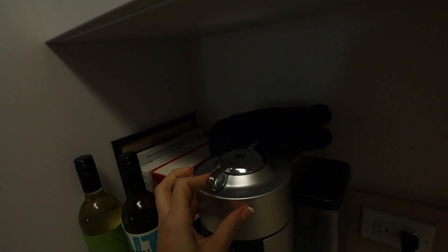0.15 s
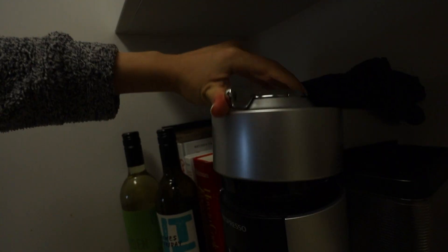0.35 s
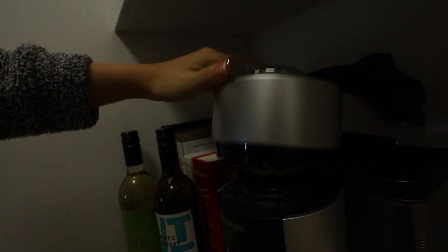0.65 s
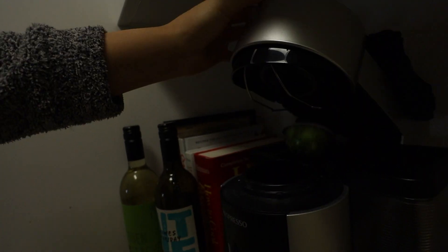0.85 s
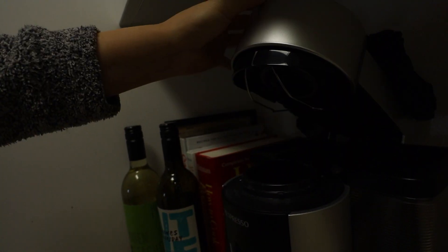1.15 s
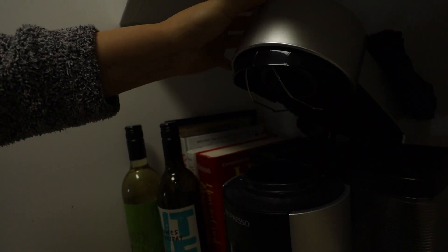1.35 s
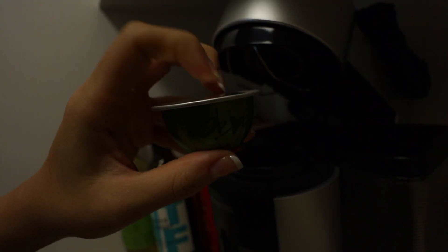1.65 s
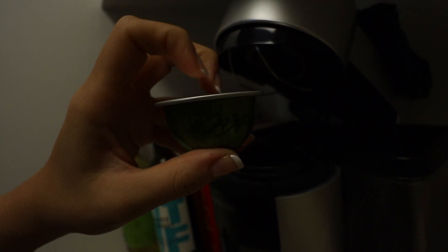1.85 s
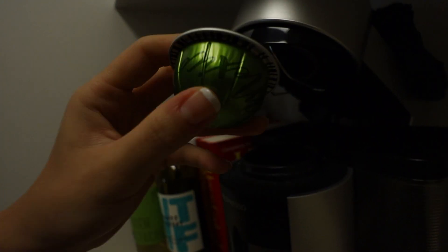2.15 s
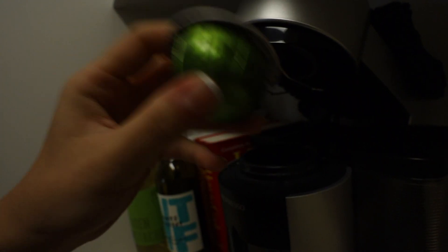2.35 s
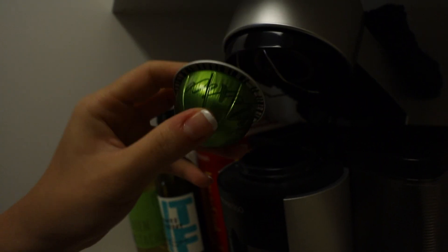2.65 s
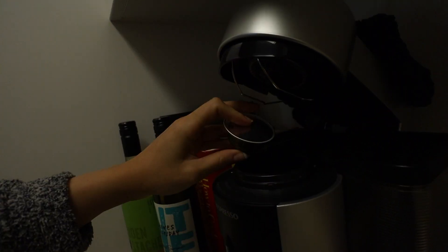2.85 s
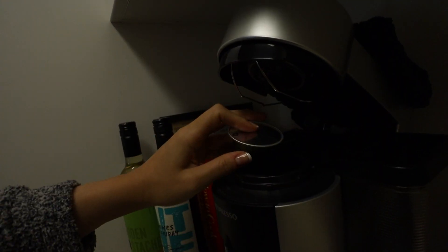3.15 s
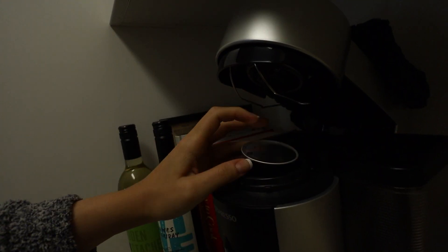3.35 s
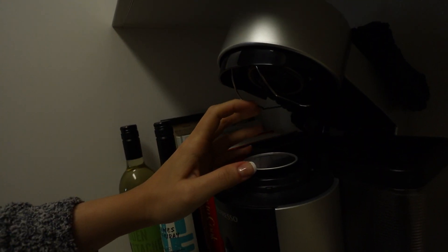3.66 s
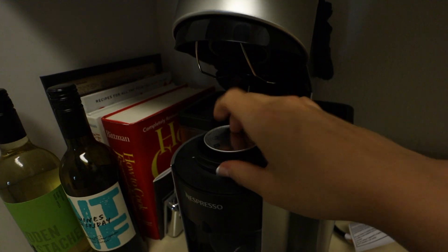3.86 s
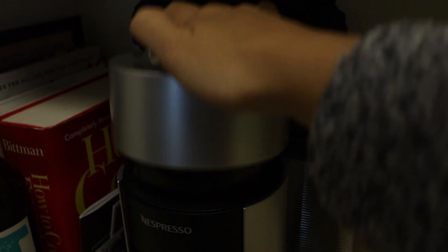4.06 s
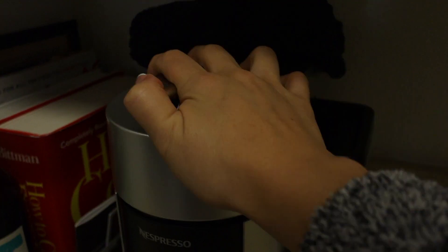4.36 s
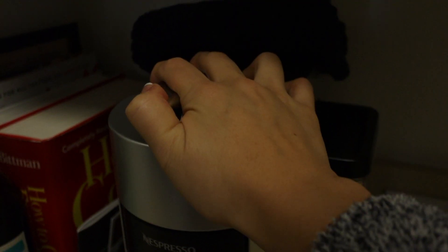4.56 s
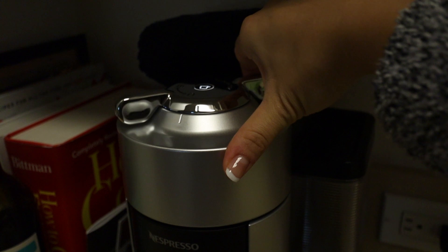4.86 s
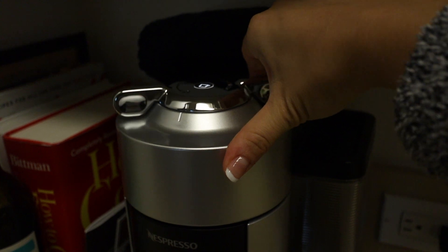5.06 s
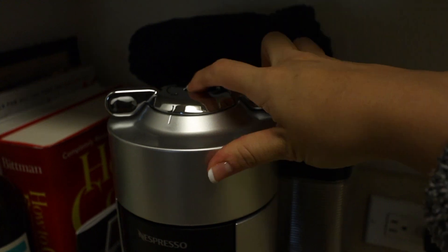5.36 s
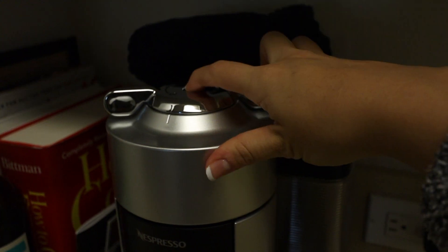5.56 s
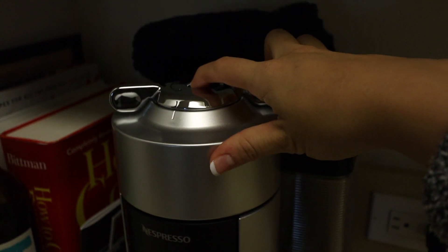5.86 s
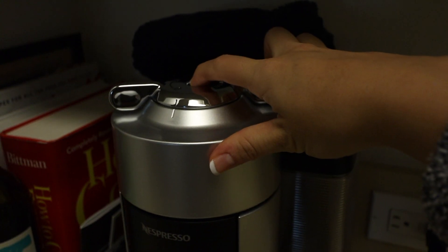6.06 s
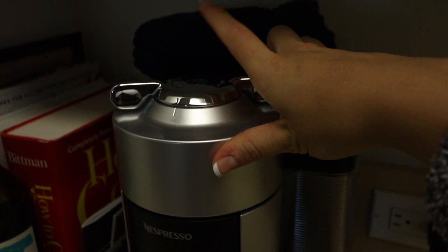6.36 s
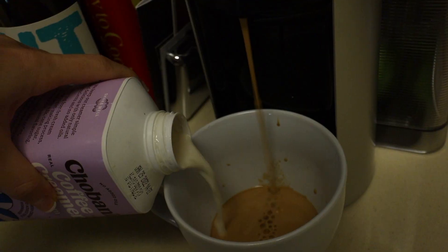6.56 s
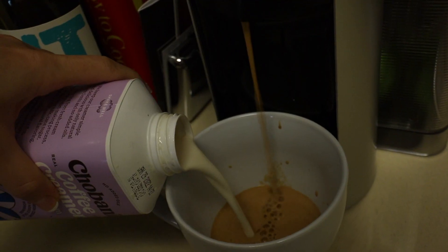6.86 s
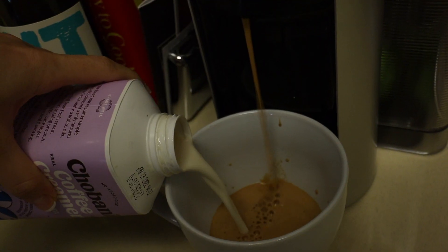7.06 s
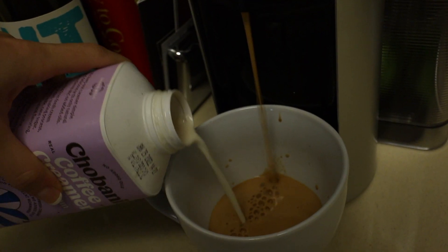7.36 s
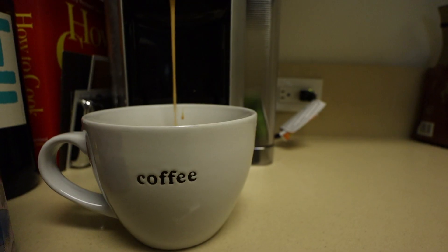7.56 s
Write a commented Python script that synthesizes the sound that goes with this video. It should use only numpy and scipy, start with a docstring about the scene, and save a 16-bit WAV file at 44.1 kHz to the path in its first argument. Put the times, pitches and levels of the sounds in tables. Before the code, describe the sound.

Dry, close-miked sounds of a capsule coffee machine, edited with abrupt cuts: lever knocks, a burst of lid rattles, light nail ticks, whispery foil strokes and thin capsule clacks. The lid slams, the latch cracks and the lever locks. After a dull button click, a buzzing motor accelerates, then switches suddenly to a softer hum with faint whine while drops plop into a mug. Short kitchen reflections, low room noise.

```python
"""A lever unlocks with hard plastic clacks, then the lid of a capsule coffee machine springs open and rattles.
Fingernails tap and stroke a foil capsule, it drops into its seat, the lid is pressed shut and locked.
A button clicks, the motor spins up, then hums while coffee and creamer splash into a mug.
Contacts are noise bursts plus ringing modes; the motor is a comb of shaft orders, tones and noise;
drops are slaps and rising sine bubbles; friction is grainy noise. A quiet room lies under it all."""
import sys
import numpy as np
from scipy import signal
from scipy.fft import rfft, irfft, next_fast_len
from scipy.io import wavfile
from scipy.ndimage import map_coordinates

SR = 44100
rng = np.random.default_rng(int(sys.argv[2]) if len(sys.argv) > 2 else 0)


def to_wav(sig):
    """Store sig (one row per channel, or 1-D mono) as 16-bit WAV at the path in sys.argv[1].

    Samples outside -1..1 are clipped; the rate is SR.
    """
    pcm = np.clip(np.atleast_2d(sig), -1, 1) * 32767
    pcm = np.round(pcm).astype(np.int16)
    wavfile.write(sys.argv[1], SR, pcm.T)  # frames by channels


N = 339570


def amp(db):
    """Decibels to gain."""
    return 10 ** (np.asarray(db) / 20)


def unit(x):
    """x at rms 1."""
    return x / np.sqrt(np.mean(x ** 2) + 1e-20)


def clock(count):
    """Sample times in seconds."""
    return np.arange(count) / SR


def along(points, hz):
    """(Hz, value) points interpolated on a log frequency axis."""
    f, v = np.transpose(points)
    return np.interp(np.log(hz + 1), np.log(f + 1), v)


def curves(rows):
    """One value per sample for each column after the time."""
    s, *cols = np.transpose(rows)
    return [np.interp(clock(N), s, c) for c in cols]


def add(track, s, x):
    """Mix x into the track from time s."""
    part = track[max(round(s * SR), 0):][:len(x)]
    part += x[:len(part)]


def coloured(x, gain):
    """x through a causal minimum-phase filter with the given gain of frequency."""
    m = 2 * next_fast_len(len(x) // 2 + 4096)
    cepstrum = irfft(np.log(np.maximum(gain(np.fft.rfftfreq(m, 1 / SR)), 1e-6)))
    # fold onto positive time
    cepstrum[1:m // 2] *= 2
    cepstrum[m // 2 + 1:] = 0
    response = np.exp(rfft(cepstrum))
    return irfft(rfft(x, m) * response)[:len(x)]


def noise(spectrum):
    """Noise of rms 1 with the given spectrum."""
    return unit(coloured(rng.standard_normal(N), lambda hz: amp(along(spectrum, hz))))


def peaks(rows, hz):
    """Gain of a few resonances."""
    return sum(amp(db) / (1 + (2 * (hz - centre) / width) ** 2) for centre, width, db in rows)


def wobble(rate_hz):
    """A smooth random curve, rate_hz knots a second."""
    coarse = np.arange(0, N + 16, 16)
    knots = rng.standard_normal(int(N * rate_hz / SR) + 4)
    smooth = map_coordinates(knots, [coarse * rate_hz / SR])
    return np.interp(np.arange(N), coarse, smooth)


def burst(spectrum, t60_s):
    """A short dying burst of noise, coloured by the body that it shakes."""
    t = clock(SR // 2)
    dying = rng.standard_normal(len(t)) * amp(-60 * t / t60_s)
    return coloured(dying, lambda hz: amp(along(spectrum, hz)))


# Reverberation of the room. Each row: frequency in Hz, t60 in seconds.
KITCHEN = [(100, 0.82), (550, 0.49), (2000, 0.47), (7000, .45), (14000, 0.14)]


def kitchen(x):
    """The room's answer to one short sound; the treble dies first."""
    hz, t, z = signal.stft(rng.standard_normal(SR // 2), SR, nperseg=256)
    decay = amp(-60 * t / along(KITCHEN, hz)[:, None])
    tail = signal.istft(z * decay, SR, nperseg=256)[1]
    tail = tail * (1 - np.exp(-clock(len(tail)) / 0.0027))
    return signal.fftconvolve(x, tail / np.linalg.norm(tail))[:len(x)]


# Times at which contact, friction and hoot sounds stop dead, in seconds.
STOPS_S = [1.523, 3.725, 4.394, 4.795, 5.359]


def stopped(x, s):
    """A sound starting at s, silenced at the next stop."""
    end = min([stop for stop in STOPS_S if stop > s], default=N / SR)
    return x * (s + clock(len(x)) < end)


# Dense clatter between a part's modes. Each row: frequency in Hz, relative level in dB per Hz.
CLATTER = [(30, -11.5), (90, 1.5), (300, -1.5), (470, -4.5), (850, -3.5), (1600, -6), (3000, -7.5),
           (6000, -10), (10000, -13.5), (11500, -18), (15000, -24.5)]
# Edges between thump, body, clack and crack, in Hz.
BANDS_HZ = [450, 1200, 3500]


def contacts(hits, modes, ring_db, ring_t60_s, snap_db, snap_t60_s, lowest_hz, room_db, detune=0.0074):
    """Each contact snaps, clatters and rings the modes; four band levels set its thump, body, clack and crack."""
    track, t = np.zeros(N), clock(SR // 2)
    edges = np.array([lowest_hz, *BANDS_HZ, SR / 2])[:, None]
    grid = np.fft.rfftfreq(len(t), 1 / SR) + 1
    bands = 1 / (1 + ((grid - edges[:-1] * edges[1:] / grid) / np.diff(edges, axis=0)) ** 6)
    lowpass = signal.butter(2, BANDS_HZ[-1], fs=SR, output="sos")
    for s, db, thump_db, clack_db, crack_db, t60_s in hits:
        # grip and point of contact shift the modes a little each time
        ring = 0
        for hz, level_db in modes:
            cycles = hz * (1 + detune * rng.normal()) * t + rng.random()
            ring = ring + amp(level_db + rng.normal(0, 2.5)) * np.sin(2 * np.pi * cycles)
        ring = ring * amp(-60 * t / ring_t60_s)
        clatter = unit(burst(CLATTER, t60_s))
        snap = unit(burst(CLATTER, snap_t60_s))
        blow = clatter + amp(snap_db) * snap + amp(ring_db) * unit(ring)
        blow = blow * (1 - np.exp(-t / 0.00072))
        low = signal.sosfiltfilt(lowpass, blow)
        blow = low + (blow - low) * amp(-60 * t / 0.23)  # plastic damps the treble soonest
        # levels are the energy of a blow, as an rms over a hundredth of a second
        wanted = amp(db + np.array([thump_db, 0, clack_db, crack_db])) ** 2 * SR / 100
        gain = np.sqrt(wanted / np.mean(bands * np.abs(rfft(blow)) ** 2, axis=1) @ bands)
        blow = coloured(blow, lambda hz: np.interp(hz, grid, gain))
        add(track, s, stopped(blow + amp(room_db) * kitchen(blow), s))
    return track


def plastic(hits, crack_db):
    """On plastic one hardness sets both the clack and the crack above it."""
    return [(s, db, thump_db, hard_db, hard_db + crack_db, t60_s) for s, db, thump_db, hard_db, t60_s in hits]


# All plastic hits below. Each row: start in seconds, body level in dB, thump in dB over the body,
# hardness in dB over the body, clatter t60 in seconds.
# All modes below. Each row: nominal frequency in Hz, nominal relative level in dB.
LEVER_HITS = [(0.045, -25, 5, 1.5, 0.1), (0.309, -20.5, -0.5, -4.5, 0.15), (0.324, -28, 1, 7, 0.038),
              (0.353, -20, -11.5, -2, 0.16), (0.462, -46, 0, 11.5, 0.035), (0.701, -20, -8, 1.5, 0.091)]
LEVER_MODES = [(100, -16), (221, 5), (382, 0), (620, 1.5), (705, -6), (830, 1), (940, 3), (1500, -4),
               (2450, -6.5), (3526, -5), (7149, -15.5)]


def lever_unlocking():
    """The plastic lever knocks loose and rings its modes."""
    return contacts(plastic(LEVER_HITS, crack_db=-3.5), LEVER_MODES, ring_db=-1.5, ring_t60_s=0.07, detune=0.025,
                    snap_db=-5, snap_t60_s=0.0082, lowest_hz=50, room_db=-22)


LID_HITS = [(0.925, -36.5, 10, 1, 0.053), (0.991, -40.5, 5.5, -3, 0.049), (1.045, -29, 10, 0.5, 0.099),
            (1.097, -15.5, 0, 5.5, 0.13), (1.139, -16.5, 5, 0.5, 0.18), (1.167, -11.5, 4, 4, 0.1),
            (1.234, -23.5, -6, 1, 0.06), (1.245, -25, 5, -0.5, 0.055), (1.28, -22.5, -6.5, -6.5, 0.054),
            (1.318, -28, 5.5, -3.5, 0.047), (1.403, -15, 5.5, 1, 0.11), (1.431, -19.5, 3.5, -0.5, 0.14),
            (1.458, -14.5, 1, 1, 0.28), (1.482, -4, -6.5, -3, 0.098)]
LID_MODES = [(190, -8.5), (275, -2.5), (325, 5), (382, 0.5), (770, -4), (880, -5.5), (1130, -9), (1604, -5),
             (1950, -5.5), (2290, -4.5), (9600, -11)]


def lid_opening():
    """The sprung lid strikes and rattles, ringing its modes."""
    return contacts(plastic(LID_HITS, crack_db=-3.5), LID_MODES, ring_db=0.5, ring_t60_s=0.088, detune=0.03,
                    snap_db=-7.5, snap_t60_s=0.014, lowest_hz=87.5, room_db=-22)


# Each row: start in seconds, body level in dB, thump, clack and crack in dB over the body, clatter t60 in seconds.
RIM_HITS = [(2.797, -23.5, -11, 2, 7, 0.096)]
RIM_MODES = [(110, -3), (754, 3.5), (1367, -3), (2982, -0.5), (5744, -7)]


def rim_knocking():
    """The capsule's rim knocks against the holder."""
    return contacts(RIM_HITS, RIM_MODES, ring_db=-1, ring_t60_s=0.035,
                    snap_db=-7.5, snap_t60_s=0.029, lowest_hz=70, room_db=-21)


# Columns as for the rim.
CAPSULE_HITS = [(2.969, -28.5, -12.5, -17.5, -29.5, 0.046), (3.361, -23.5, -23.5, 5, -2, 0.028),
                (3.383, -27.5, -10, 1, -4.5, 0.094), (3.402, -22.5, -19, -10, -8, 0.028),
                (3.479, -29, -25, 6, -11, 0.016), (3.544, -37.5, -26, -12, -12, 0.097),
                (3.582, -24, -25, -5.5, -18.5, 0.093), (3.845, -22.5, -7.5, -36, -14, 0.012),
                (4.045, -33.5, -16, -22, -34, 0.029), (4.067, -30.5, -3, -15, -11, 0.07)]
CAPSULE_MODES = [(120, -10), (570, 2.5), (650, 8), (780, 5), (920, 0.5), (1480, -0.5), (1780, -1),
                 (2950, -17), (5900, -13.5)]


def capsule_landing():
    """The foil capsule lands on its rim or its cup, so its crack differs each time."""
    return contacts(CAPSULE_HITS, CAPSULE_MODES, ring_db=8, ring_t60_s=0.031, detune=0.032,
                    snap_db=0, snap_t60_s=0.006, lowest_hz=79.5, room_db=-20)


SHUT_HITS = [(4.128, -15, -15, 12, 0.026), (4.141, -22, -7.5, 3.5, .12), (4.171, -32.5, 2.5, -2.5, 0.04)]
SHUT_MODES = [(215, -5.5), (900, -5), (1340, -10), (1560, -3), (4200, -16.5)]


def lid_shutting():
    """The lid slams shut; its ring is short."""
    return contacts(plastic(SHUT_HITS, crack_db=-6.5), SHUT_MODES, ring_db=-3.5, ring_t60_s=0.012,
                    snap_db=-5, snap_t60_s=0.0056, lowest_hz=31, room_db=-11.5)


LATCH_HITS = [(4.485, -32.5, 0.5, -7, 0.11), (4.503, -7, -13.5, 1, 0.089)]
LATCH_MODES = [(200, -8), (420, -11.5), (870, 4), (985, -1), (1680, -0.5), (2360, -7), (3100, -10.5)]


def latch():
    """The latch catches and rings its modes."""
    return contacts(plastic(LATCH_HITS, crack_db=-4.5), LATCH_MODES, ring_db=-4.5, ring_t60_s=0.042,
                    snap_db=-4, snap_t60_s=0.04, lowest_hz=55, room_db=-18)


LOCK_HITS = [(4.902, -25, -3.5, -5, 0.11), (5.133, -47.5, -10, 4, 0.056), (5.148, -38, 0, 1, 0.09),
             (5.157, -6.5, -3, -6.5, 0.096)]


def lever_locking():
    """The lever swings home and locks, ringing the latch's modes."""
    return contacts(plastic(LOCK_HITS, crack_db=-3), LATCH_MODES, ring_db=-2, ring_t60_s=0.042,
                    snap_db=-5, snap_t60_s=0.018, lowest_hz=135, room_db=-20.5)


def buzz(turn, gain, count):
    """The same rough spots pass once a turn: every shaft order up to count, coloured by gain, at rms 1."""
    one_turn = irfft(np.r_[0, np.exp(2j * np.pi * rng.random(count))], 8192)
    place = np.arange(len(one_turn)) / len(one_turn)
    passing = np.interp(turn / (2 * np.pi) % 1, place, one_turn)
    return unit(coloured(passing, gain))


MOTOR_ON_S, BREW_ON_S = 5.757, 6.465
# Nominal shaft speed. Each row: time in seconds, turns per second.
SPIN = [(5.757, 15.05), (6.0, 23.7), (6.183, 28.95), (6.465, 37.8)]
# Gear tones. Each row: shaft order, nominal relative level in dB.
SPIN_ORDERS = [(4, -19), (6, -14.5), (7, -15.5), (13, -12.5), (48, -22.5), (72, -24), (96, -28), (120, -28),
               (144, -29)]
# Rush and whir. Each row: frequency in Hz, relative level in dB per Hz.
SPIN_COLOUR = [(24, -45), (101, -7.5), (224, -2), (449, 0), (577, -5), (778, -3.5), (1130, -11.5),
               (1730, -18), (5400, -24), (6320, -33), (7910, -27), (15500, -39.5)]
# Housing resonances. Each row: frequency in Hz, width in Hz, relative level in dB.
HOUSING = [(445, 60, 6), (789, 78, 1), (1242, 100, -3), (2230, 160, -9.5), (3000, 130, -15),
           (3740, 240, -11.5), (4290, 170, -14.5), (5530, 250, -19)]
SPIN_DB, SPIN_DB_PER_DOUBLING = -32, 6
SPIN_REFERENCE_HZ = 26.5


def spin_up(rush_db=-13, buzz_db=-3.5, waver_rad=1.1, swell_db_per_hz=0.38, pulsing=0.24, rattle_db=-8):
    """The motor whirls the capsule faster: rough spots shake the housing each turn, a comb climbs, gears sing."""
    t = clock(N)
    speed_hz, = curves(SPIN)
    turn = 2 * np.pi * np.cumsum(speed_hz * (1 + 0.003 * wobble(60))) / SR
    tones = 0
    for order, level_db in SPIN_ORDERS:
        level = amp(level_db + 2.1 * wobble(25))
        waver = waver_rad * np.sqrt(order / SPIN_ORDERS[-1][0]) * wobble(200)
        tones = tones + level * np.sqrt(2) * np.sin(order * turn + waver)
    rattle = buzz(turn, lambda hz: peaks(HOUSING, hz), count=400)
    whir = buzz(turn, lambda hz: amp(along(SPIN_COLOUR, hz)), count=560)
    pulse = 1 + pulsing * np.sin(4 * turn)
    rough = amp(rush_db) * noise(SPIN_COLOUR) + amp(rattle_db) * rattle + amp(buzz_db) * whir
    motor = rough * pulse + tones
    # imbalance shakes the housing harder with speed, so the low end swells most
    low = signal.sosfiltfilt(signal.butter(2, 700, fs=SR, output="sos"), motor)
    motor = motor + low * (amp(swell_db_per_hz * (speed_hz - SPIN_REFERENCE_HZ)) - 1)
    db = SPIN_DB + SPIN_DB_PER_DOUBLING * np.log2(speed_hz / SPIN_REFERENCE_HZ)
    return amp(db) * motor * ((t > MOTOR_ON_S) & (t < BREW_ON_S))


# Two stretches. Each row: start in seconds, nominal turns per second, then gains in dB of the rush,
# the bearing hiss, the lower gear tone and the upper gear tone at the top of its swell.
BREW = [(6.465, 68.5, -46, -55.5, -63, -54.5), (7.43, 66.9, -43.5, -56.5, -52.5, -75)]
# Singing shaft orders. Each row: order, nominal rms level in dB in the first stretch, in the second.
BREW_ORDERS = [(1, -44, -46.5), (2.66, -56, -59), (3, -46.5, -50.5), (3.98, -53, -58), (6, -55, -57.5),
               (7.18, -64, -71), (7.97, -53.5, -50.5), (11.77, -54.5, -62), (13.33, -57, -68),
               (25, -80, -61), (41.3, -76, -64), (43.7, -59.5, -60), (76.3, -63, -76), (103, -67, -67),
               (118, -66, -70)]
# Mains hum. Each row: frequency in Hz, rms level in dB.
MAINS = [(60, -53.5), (120, -52.5)]
# Rush and whir. Each row: frequency in Hz, relative level in dB per Hz.
BREW_COLOUR = [(30, -32), (70, -15), (160, -16.5), (202, -1), (240, -7), (410, -8), (800, -14), (1640, -23),
               (3300, -21.5), (6160, -29.5), (8110, -28), (15500, -35.5)]
# Bearing hiss. Each row: frequency in Hz, width in Hz, relative level in dB.
BEARING = [(3100, 360, -12), (5157, 330, -1.5), (8000, 320, 5)]
GEAR_PEAK_S, GEAR_RISE_DB_PER_S = 7.02, 28  # the upper gear tone swells until this time


def brewing(flutter=0.37, rush_flutter=0.36, buzz_db=-2):
    """The steady spin hums, buzzes and beats against the mains; gears sing and the bearing hisses in pulses."""
    t = clock(N)
    stretch = (t >= BREW[1][0]).astype(int)
    speed_hz, rush_db, hiss_db, lower_db, upper_db = np.array(BREW)[stretch, 1:].T
    upper_db = upper_db - GEAR_RISE_DB_PER_S * np.maximum(GEAR_PEAK_S - t, 0)
    turn = 2 * np.pi * np.cumsum(speed_hz * (1 + 0.0006 * wobble(15))) / SR
    hum = 0
    for order, *dbs in BREW_ORDERS:
        level = amp(np.take(dbs, stretch) + 1.5 * wobble(9))
        hum = hum + level * np.sin(order * turn + 2 * np.pi * rng.random())
    mains = sum(amp(db) * np.sin(2 * np.pi * hz * t) for hz, db in MAINS)
    mesh = 24 * turn + 0.4 * wobble(90)
    gears = amp(lower_db) * np.sin(mesh) * (1 + flutter * np.sin(turn)) + amp(upper_db) * np.sin(2 * mesh)
    hiss = unit(coloured(rng.standard_normal(N), lambda hz: peaks(BEARING, hz)))
    hiss = hiss * (1 + flutter * np.sin(2 * turn))
    whir = buzz(turn, lambda hz: amp(along(BREW_COLOUR, hz)), count=130)
    rush = (noise(BREW_COLOUR) + amp(buzz_db) * whir) * (1 + rush_flutter * np.sin(turn))
    tones = np.sqrt(2) * (hum + mains + gears)
    return (tones + amp(hiss_db) * hiss + amp(rush_db) * rush) * (t >= BREW_ON_S)


def ticks(rows, spectrum, t60_s, room_db):
    """Light clicks of one colour, each set by its peak before the room's answer."""
    track = np.zeros(N)
    for s, db in rows:
        click = burst(spectrum, t60_s)
        click = amp(db) * click / np.abs(click).max()
        add(track, s, click + amp(room_db) * kitchen(click))
    return track


# Each row: start in seconds, level in dB before the bubble and splash gains, starting bubble pitch in Hz.
DRIPS = [(6.495, -30, 655), (6.525, -35, 810), (6.587, -28, 895), (6.63, -31.5, 651), (6.693, -31, 800),
         (6.733, -34, 650), (6.765, -39, 800), (6.795, -31, 625), (6.884, -27, 644), (6.911, -27, 630),
         (6.968, -33, 715), (7.037, -31, 860), (7.176, -34, 650), (7.305, -31, 930), (7.337, -30, 556),
         (7.38, -29, 557)]
# Bursting froth bubbles. Each row: start in seconds, dry peak in dB.
FROTH = [(6.854, -28), (7.045, -26), (7.222, -29.5), (7.339, -28), (7.382, -28)]


def pouring(bubble_db=-2, t60_s=0.027, rise_per_s=3, splash_db=-2, small_db=-39, count=30):
    """Drops slap the coffee and trap bubbles whose pitch rises; froth bursts with tiny ticks."""
    track, t = np.zeros(N), clock(SR // 10)
    first_s, last_s = DRIPS[0][0], DRIPS[-1][0]
    # smaller drops fall at random between the big ones
    small = [(first_s + when * (last_s - first_s), small_db + 6 * size, 550 * 2.2 ** pitch)
             for when, size, pitch in rng.random((count, 3))]
    drops = [*DRIPS, *small]
    for s, db, hz in drops:
        bubble = np.sin(2 * np.pi * hz * t * (1 + rise_per_s * t / 2)) * amp(-60 * t / t60_s)
        add(track, s, amp(db + bubble_db) * bubble)
    slap_colour = [(200, -16), (600, 4.5), (900, 15), (1400, 1), (3000, -5.5), (12000, -19)]  # (Hz, dB per Hz)
    froth_colour = [(500, -11), (2500, 9), (5000, -3), (14000, -13)]  # (Hz, dB per Hz)
    slaps = ticks([row[:2] for row in drops], slap_colour, t60_s=0.008, room_db=-20)
    froth = ticks(FROTH, froth_colour, t60_s=0.0025, room_db=-21)
    return track + amp(splash_db) * slaps + froth


# Each row: start in seconds, dry peak in dB.
NAILS = [(1.5738, -29), (1.716, -35), (1.7925, -17.5), (1.8736, -26), (1.9677, -18.5), (2.0458, -32.5),
         (2.134, -23.5), (2.7199, -35)]
# Each row: frequency in Hz, relative level in dB per Hz.
NAIL_COLOUR = [(35, -32), (60, -1.5), (183, -4.5), (829, -25.5), (3580, -14), (4520, -9.5), (8090, -14.5),
               (15500, -31.5)]


def fingernails():
    """Fingernails tap the capsule: short coloured clicks."""
    return ticks(NAILS, NAIL_COLOUR, t60_s=0.014, room_db=-20)


# Each row: start in seconds, dry peak in dB.
BUTTON = [(5.517, -47.5), (5.562, -48), (5.579, -29)]
# Each row: frequency in Hz, relative level in dB per Hz.
BUTTON_COLOUR = [(100, -38.5), (650, -7), (990, -2.5), (1300, -16), (3700, -22.5), (15000, -40)]


def button():
    """The finger settles on the button and presses it: duller, longer clicks."""
    return ticks(BUTTON, BUTTON_COLOUR, t60_s=0.083, room_db=-18)


def seal(start_s=4.169, length_s=0.031, from_hz=485, to_hz=595, db=-14, room_db=-10):
    """The closing lid squeezes air past the capsule: a hollow hoot bends upward, strongest just before it ends."""
    t, track = clock(SR // 2), np.zeros(N)
    pitch_hz = np.interp(t, [0, length_s], [from_hz, to_hz])
    swell = np.interp(t / length_s, [0, 0.1, 0.85, 1.1], [0, 0.6, 1, 0])
    hoot = amp(db) * swell * np.sin(2 * np.pi * np.cumsum(pitch_hz) / SR)
    add(track, start_s, stopped(hoot + amp(room_db) * kitchen(hoot), start_s))
    return track


SLIDE_ATTACK_S, SLIDE_SWELL_DB = 0.022, 10.5


def sliding(rows, spectrum, fall_db_per_s, grain_db):
    """Grainy friction that swells while the part is pushed and dies away once it catches."""
    t, level = clock(N), np.zeros(N)
    for start_s, catch_s, db in rows:
        length_s = max(catch_s - start_s, SLIDE_ATTACK_S)
        shape_db = np.minimum(SLIDE_SWELL_DB * (t / length_s - 1), fall_db_per_s * (length_s - t))
        push = amp(db + shape_db) * np.minimum(t / SLIDE_ATTACK_S, 1)
        add(level, start_s, stopped(push, start_s))
    return level * unit(noise(spectrum) * amp(grain_db * wobble(450)))


# Each row: start in seconds, catch in seconds, level at the catch in dB.
SLIDES = [(0.0, 0.06, -41.5), (0.27, 0.33, -41), (0.59, 0.72, -37.5), (3.37, 3.57, -49.5),
          (3.99, 4.12, -42), (4.46, 4.5, -39), (4.82, 4.92, -44.5), (4.98, 5.16, -49.5)]
# Each row: frequency in Hz, relative level in dB per Hz.
SLIDE_COLOUR = [(30, -26), (70, -0.5), (486, -3), (849, -1.5), (1150, -14), (1590, -10), (4120, -21),
                (5840, -19.5), (7540, -23), (15500, -37)]


def parts_sliding():
    """Plastic slides on plastic, pressed ever harder until it catches."""
    return sliding(SLIDES, SLIDE_COLOUR, fall_db_per_s=101.5, grain_db=1)


# One row: start in seconds, catch in seconds, level at the catch in dB.
SCRAPE = (3.085, 3.174, -43)
# Each row: frequency in Hz, relative level in dB per Hz.
SCRAPE_COLOUR = [(400, -13.5), (830, 6.5), (1200, -19), (1800, -9.5), (4400, -21), (5400, -6), (6700, -22),
                 (7700, -2), (10000, -20), (13000, -17), (15000, -24)]


def rim_scraping():
    """The capsule's rim scrapes into its seat with a coarser grain."""
    return sliding([SCRAPE], SCRAPE_COLOUR, fall_db_per_s=194, grain_db=3.5)


# Each row: middle in seconds, level in dB, half length in seconds.
STROKES = [(2.29, -44.5, 0.01), (2.381, -53.5, 0.018), (2.451, -40.5, 0.014), (2.523, -54.5, 0.017),
           (2.594, -42, 0.015)]
# Each row: frequency in Hz, relative level in dB per Hz.
FOIL = [(800, -42), (2800, -17), (4200, -7), (7400, -3), (13000, -3), (15500, -10.5)]


def foil_strokes(grain_db=2):
    """Fingers whisper over the foil: bell-shaped swells of grainy noise."""
    t = clock(N)
    strokes = sum(amp(db) * np.exp(-0.5 * ((t - s) / half_s) ** 2) for s, db, half_s in STROKES)
    return strokes * unit(noise(FOIL) * amp(grain_db * wobble(730)))


def creak(start_s=3.992, length_s=0.045, from_hz=300, to_hz=750, db=-44):
    """The hinge slips faster and faster as the lid comes down: a speeding train of pulses."""
    t, track = clock(round(length_s * SR)), np.zeros(N)
    rate_hz = np.interp(t, [0, length_s], [from_hz, to_hz])
    slips = np.diff(np.floor(np.cumsum(rate_hz) / SR), prepend=0)
    rasp = unit(coloured(slips, lambda hz: amp(along(SLIDE_COLOUR, hz))))
    add(track, start_s, amp(db) * rasp * np.sin(np.pi * t / length_s))
    return track


# Each row: frequency in Hz, relative level in dB per Hz.
QUIET = [(12, -26), (22, -11.5), (225, -30.5), (958, -40.5), (10000, -46.5), (15500, -52.5)]


def quiet_room():
    """Steady, mostly low noise of the room."""
    return amp(-61) * noise(QUIET)


def scene():
    """The machine's parts, the motor, the mug and the hands over a quiet room."""
    opening = lever_unlocking() + lid_opening()
    loading = rim_knocking() + capsule_landing()
    closing = lid_shutting() + latch() + lever_locking() + seal() + creak()
    motor = spin_up() + brewing()
    hands = fingernails() + button() + foil_strokes()
    friction = parts_sliding() + rim_scraping()
    return (opening + loading + closing + motor + pouring() + hands + friction + quiet_room())[None]


def record(dry, top_hz=15800):
    """The loudest blows overload the microphone; a lowpass removes what lies above the band limit."""
    clipped = np.clip(dry, -1, 1)
    lowpass = signal.firwin(161, top_hz, fs=SR)
    return signal.fftconvolve(clipped, lowpass[None], "same", axes=1)


dry = scene()
out = record(dry)
to_wav(out)
```